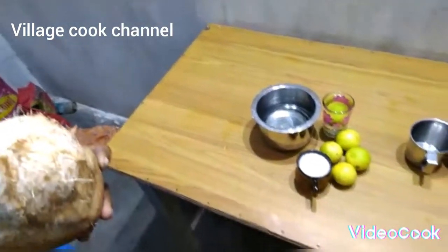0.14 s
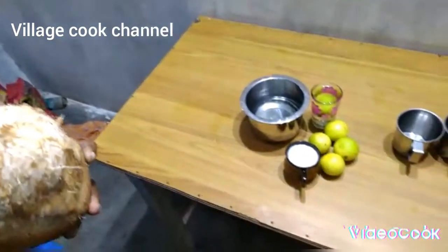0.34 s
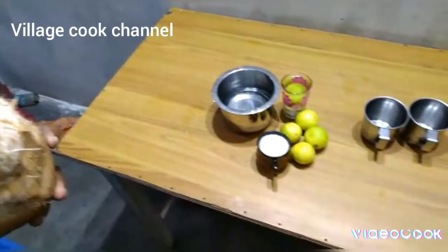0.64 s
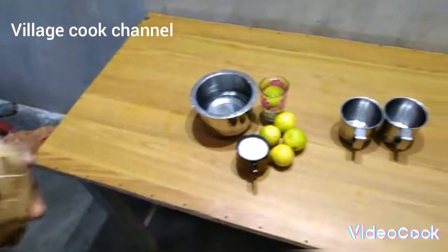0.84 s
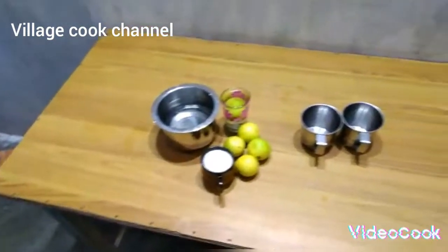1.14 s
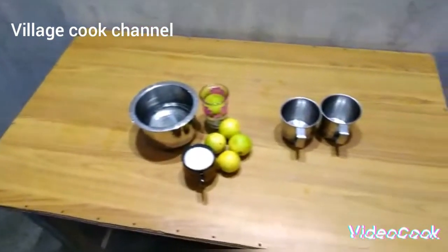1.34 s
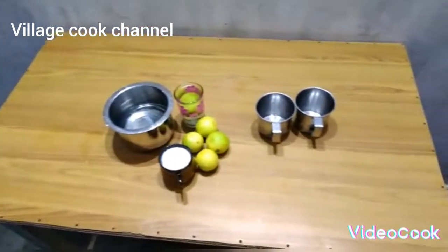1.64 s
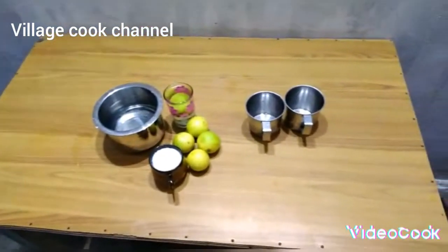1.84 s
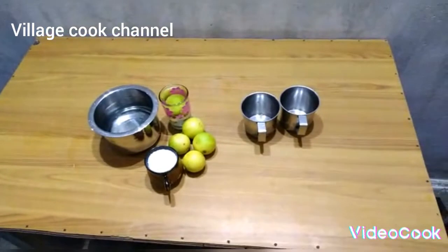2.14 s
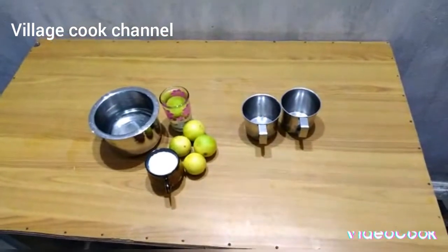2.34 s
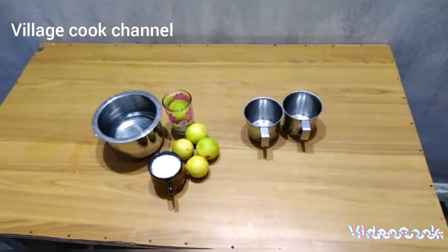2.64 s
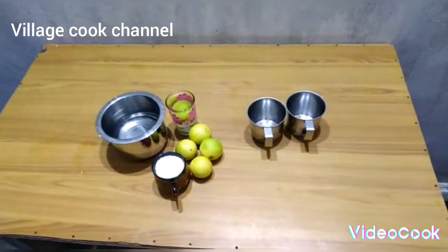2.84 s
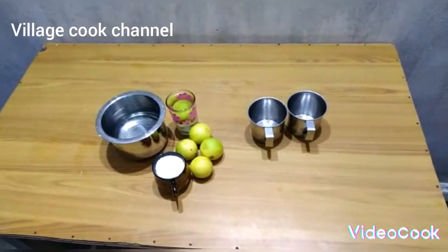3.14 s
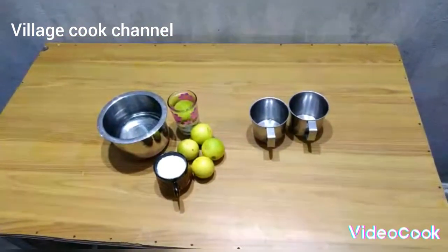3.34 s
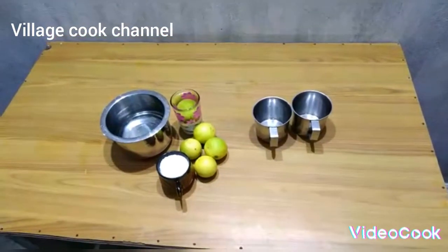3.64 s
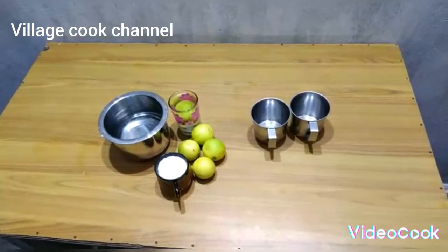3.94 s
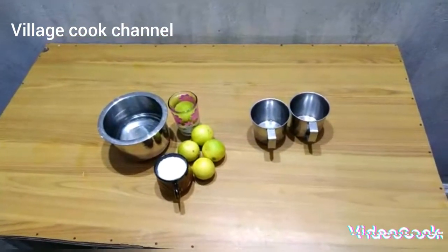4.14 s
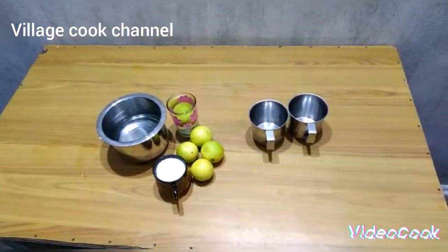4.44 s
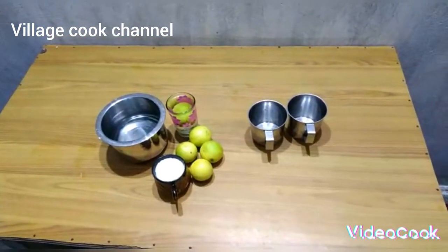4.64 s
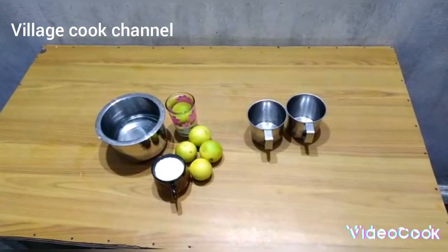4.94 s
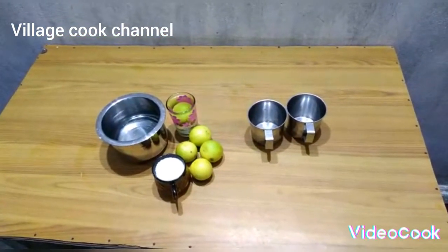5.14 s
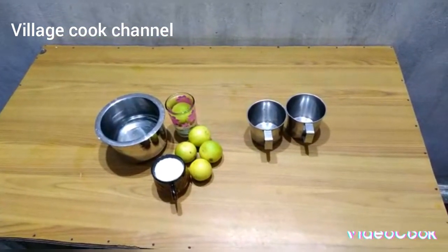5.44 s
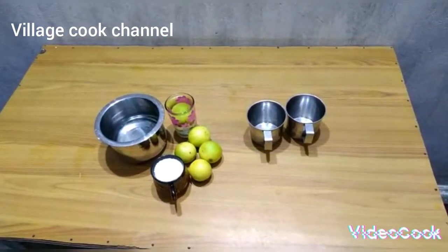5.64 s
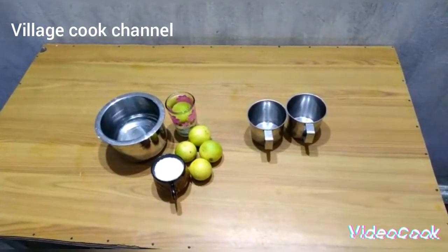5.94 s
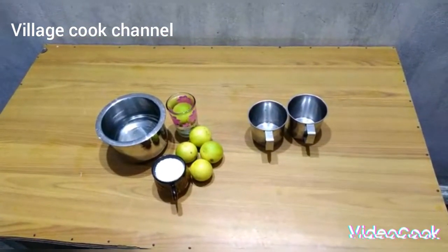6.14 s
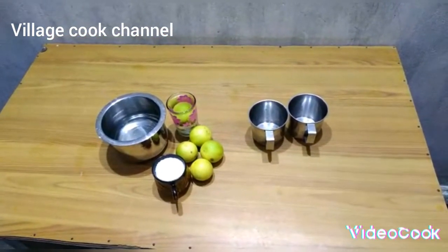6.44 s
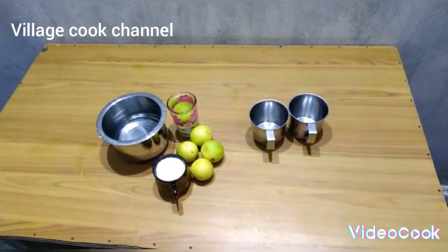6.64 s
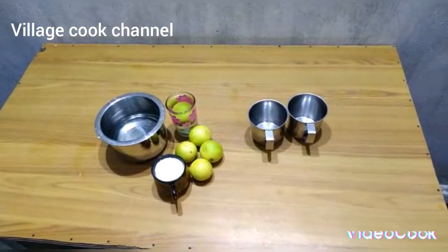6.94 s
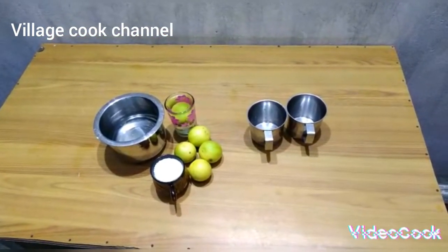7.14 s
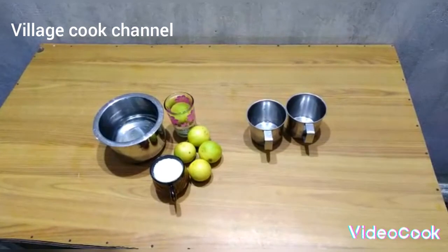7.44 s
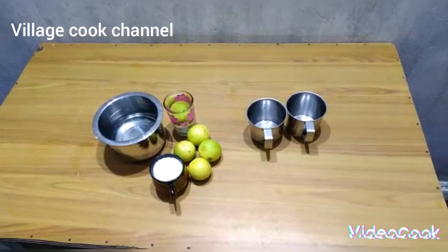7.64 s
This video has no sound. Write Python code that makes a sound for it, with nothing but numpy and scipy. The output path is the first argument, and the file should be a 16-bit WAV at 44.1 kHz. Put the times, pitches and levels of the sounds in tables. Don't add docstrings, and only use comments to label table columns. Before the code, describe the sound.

A phone close by hears a heavy knife working on a coconut: a loud first knock, a boomy chop, then brighter cracking chops, each preceded by a duller, mostly quieter knock. The last two chops are loudest. Hard walls return a half-second tail and steel cups ring very faintly. Dry husk rustles briefly in the hands; distant dove coos and thin bird whistles fill the gaps above soft village hum.

```python
import sys
import numpy as np
from scipy import signal
from scipy.io import wavfile
from scipy.ndimage import uniform_filter1d

SR = 44100
rng = np.random.default_rng(int(sys.argv[2]) if len(sys.argv) > 2 else 0)


def convert_level_to_amplitude(level_db):
    exponent = np.asarray(level_db, float) / 20
    return 10 ** exponent


def unload_wav(signal):
    wavfile.write(
        sys.argv[1],
        SR,
        np.round(np.clip(np.atleast_2d(signal).T, -1, 1) * 32767).astype(np.int16),
    )


N = 343494


def blow(db, hz, crack_db, thump_db, room_db, rise_s):
    # [ratio to the pitch, level/dB, t60/s]
    shell_modes = [(.8, 4.5, 0.0073), (1.0, 0.5, 0.013), (1.22, -4, 0.011), (1.6, -5.5, 0.008)]
    # [f/Hz, level/dB, t60/s]
    blade_modes = [(1436, -14.5, .02), (2315, -9.5, 0.037)]
    # [f/Hz, level/dB, t60/s]
    thump_modes = [(173.5, -5.5, .02), (250, -7, 0.04), (470, -2.5, 0.023), (620, -0.5, 0.02)]
    # [level/dB, t60/s]
    steel_decays = [(-39.5, 2.4), (-35.5, .8), (-40.5, 0.37), (-39, 0.32), (-39, 0.89), (-40.5, 0.66),
                    (-30.5, 0.7), (-44, .4), (-43, 0.77), (-37, .6), (-44, 0.61), (-43, 1.1), (-46, 0.57),
                    (-49, .25)]
    steel_hz = [276, 441, 478, 573, 603, 733, 845, 991, 1037, 1125, 1304, 1378, 1520, 2205]

    shell = modes(shell_modes, hz) + modes(blade_modes, rng.uniform(0.77, 1.04))
    thump = convert_level_to_amplitude(thump_db) * modes(thump_modes)
    rise = 1 - np.exp(-np.arange(len(shell)) / (rise_s * SR))
    near = rise * (0.88 * shell + 0.51 * thump)
    far = rise * (shell + thump)
    add(near, 0, convert_level_to_amplitude(crack_db + 16) * crack(.0016))
    add(far, 0, convert_level_to_amplitude(crack_db + 7.5) * edge())
    sound = room(far, room_db)
    add(sound, 0, direct(near))

    share_db = rng.uniform(-7, 5.8, len(steel_decays))
    shaken = [(f, level + share, t60) for f, share, (level, t60) in zip(steel_hz, share_db, steel_decays)]
    steel = modes(shaken, seconds=0.8)
    steel = convert_level_to_amplitude(thump_db + room_db) * steel * signal.windows.tukey(len(steel), .03)
    add(sound, .004, direct(steel))
    return convert_level_to_amplitude(db) * sound


def modes(table, scale=1, seconds=.06):
    return sum((-1) ** k * convert_level_to_amplitude(db) * ring(hz * scale, t60, seconds) for k, (hz, db, t60) in enumerate(table))


def ring(hz, t60, seconds=.12):
    t = np.arange(round(seconds * SR)) / SR
    return convert_level_to_amplitude(-60 * t / t60) * np.sin(2 * np.pi * hz * t)


def crack(decay_s):
    burst = rng.standard_normal(1024) * np.exp(-np.arange(1024) / SR / decay_s)
    return np.convolve(burst / np.linalg.norm(burst), edge())


def edge():
    # [f/Hz, level/dB]
    crack_colour = [(200, -18.5), (800, -12.5), (2000, 10), (4000, -0.5), (7000, -7), (11000, -7),
                    (14000, -17.5), (15600, -23.5), (16500, -41.5)]
    level_db = read(crack_colour, np.linspace(0, SR / 2, 129))
    taps = signal.minimum_phase(signal.firwin2(255, np.linspace(0, 1, 129), convert_level_to_amplitude(2 * level_db)))
    return taps / np.linalg.norm(taps)


def tick(db, hz):
    snap = 0.45 * ring(hz, .008, seconds=.04)
    add(snap, 0, convert_level_to_amplitude(9.5) * crack(0.0018))
    sound = room(snap, -5.5)
    add(sound, 0, direct(snap))
    return convert_level_to_amplitude(db + 9.5) * sound


def rustle(rows):
    s, db = np.transpose(rows)
    t = np.arange(s[0], s[-1], 1 / SR)
    shape = (2, len(t))
    size = convert_level_to_amplitude(2.3 * rng.exponential(1, shape))
    size = size * (rng.random(shape) < 4000 / SR)
    size = size * rng.choice([-1, 1], shape)
    snaps = evened(signal.oaconvolve(size, np.diff(edge())[None], axes=1)[:, :len(t)])
    return snaps * convert_level_to_amplitude(np.interp(t, s, db)) * signal.windows.tukey(len(t), .2)


def bird(rows, waver, lift_db):
    s, hz, db = np.transpose(rows)
    t = np.arange(s[0], s[-1], 1 / SR)
    drift = uniform_filter1d(rng.standard_normal((2, len(t))), 600) * 24
    turn = 2 * np.pi * np.cumsum(np.interp(t, s, hz) * (1 + waver * drift[0])) / SR
    level_db = np.interp(t, s, db) + lift_db + 2.6 * drift[1]
    note = np.cos(turn) * convert_level_to_amplitude(level_db) * signal.windows.tukey(len(t), .15)
    sound = room(note, -6.5)
    add(sound, 0, note * np.array([[.7], [1.2]]))
    return sound


def direct(sound):
    return np.array([sound, .8 * np.pad(sound, (6, 0))[:len(sound)]])


def room(sound, room_db):
    # [f/Hz, t60/s]
    room_t60 = [(100, .5), (300, 0.5), (700, 0.45), (1500, 0.47), (3000, 0.35), (6000, 0.43), (12000, 0.27)]
    # [f/Hz, level/dB]
    room_colour = [(100, -17), (400, 3), (1200, -2.5), (3000, 1), (8000, 1.5), (15000, 2.5)]
    tail = diffuse(SR, lambda hz, t: read(room_colour, hz) - 60 * t / read(room_t60, hz))
    tail *= 1 - np.exp(-np.arange(SR) / (0.0046 * SR))
    return convert_level_to_amplitude(room_db) * signal.fftconvolve(sound[None], tail / np.linalg.norm(tail[0]), axes=1)


def diffuse(length, field_db):
    # [f/Hz, likeness 0-1]
    ports_alike = [(30, 0.42), (250, .95), (600, 0.6), (1200, 0.02), (2400, 0.8), (5000, .05)]
    # [f/Hz, phase/rad]
    port_lead = [(100, 0.75), (600, 0.73), (1200, .3), (1900, -1.5), (3000, 0.56), (8000, -0.096)]
    hz = np.fft.rfftfreq(512, 1 / SR)[:, None]
    t = np.arange(length // 128 + 5) * 128 / SR
    a, b, c, d = rng.standard_normal((len(t), 257, 4)).T
    alike = np.clip(read(ports_alike, hz), 0, 1)
    first = a + 1j * b
    second = alike * first * np.exp(1j * read(port_lead, hz)) + np.sqrt(1 - alike ** 2) * (c + 1j * d)
    z = np.array([first, second]) * convert_level_to_amplitude(field_db(hz, t))
    return signal.istft(z, nperseg=512, noverlap=384)[1][:, :length]


def air():
    # [f/Hz, level/dB]
    air_colour = [(25, 11.5), (60, 2), (120, -4), (250, -3), (500, -7.5), (1200, -13.5), (2500, -18),
                  (5000, -24), (10000, -29), (15500, -37.5)]
    swell = rng.standard_normal((N // 128 + 5, 257)).T
    swell = evened(uniform_filter1d(uniform_filter1d(swell, 6, 0), 40, 1))
    hum = diffuse(N, lambda hz, t: read(air_colour, hz) + 0.93 * swell * 1500 / (1500 + hz))
    return convert_level_to_amplitude(-57) * evened(hum)


def evened(x):
    return x / np.sqrt(np.mean(x ** 2) + 1e-20)


def read(points, hz):
    f, value = np.transpose(points)
    return np.interp(np.log(hz + 1), np.log(f + 1), value)


def add(mix, s, sound):
    part = mix[..., round(s * SR):][..., :sound.shape[-1]]
    part += sound[..., :part.shape[-1]]


def scene():
    # [t/s, blow level/dB, shell f/Hz, then edge crack, low thump and room level/dB re blow]
    knocks = [
        (0.4428, -8.5, 820, -21, -5.5, -4),
        (1.3804, -38.5, 620, -3, 3, 7),
        (2.257, -18.5, 820, -15, -6.5, 6),
        (3.705, -19.5, 760, -12, 3.5, 0),
        (5.4581, -27.5, 520, -5.5, 8.5, -3),
        (6.46, -20, 780, -16, -4.5, 4.5),
    ]
    chops = [
        (0.8357, -10.5, 852, 1.5, -2.5, 10),
        (1.7383, -9, 1250, 4.5, -2.5, 4.9),
        (2.6255, -9.5, 1242, 4.5, -7.5, 6.2),
        (4.094, -6.5, 1089, 2, -8.5, 5.3),
        (5.8405, -4.5, 1170, -1.5, -3.5, 1.4),
        (6.8011, -4.5, 1242, -2.5, -15, 5.67),
    ]
    # [t/s, peak level/dB, f/Hz]
    ticks = [(2.0902, -51, 3430), (4.034, -38.5, 1960), (4.715, -51, 2070), (4.7751, -49, 2030),
             (5.3744, -63, 4100), (5.4102, -42.5, 2560), (5.7913, -38.5, 3415), (6.765, -46.5, 3975),
             (7.3592, -52.5, 3320), (7.3911, -44, 3480), (7.5727, -55.5, 1925), (7.6375, -46.5, 1880)]
    # [t/s, level/dB]
    rustles = [
        [(2.04, -76), (2.046, -75), (2.082, -80), (2.092, -55), (2.16, -97)],
        [(5.1, -65), (5.178, -63.5), (5.252, -68), (5.288, -48), (5.35, -70), (5.38, -54.5), (5.392, -72.5),
         (5.44, -79.5)],
        [(7.5, -83), (7.506, -89), (7.56, -58), (7.572, -54.5), (7.648, -69.5), (7.708, -92), (7.72, -77)],
    ]
    # [t/s, f/Hz, level/dB]
    coos = [
        [(1.47, 437, -71), (1.514, 426, -61), (1.526, 440, -53), (1.56, 448.1, -77)],
        [(1.63, 410.8, -71), (1.666, 426, -50), (1.682, 426, -66), (1.72, 447.9, -81)],
        [(2.46, 444, -76), (2.488, 434, -67), (2.512, 425, -57), (2.522, 430, -59), (2.56, 440, -67)],
        [(3.24, 448, -75), (3.276, 441, -56.5), (3.402, 425, -75), (3.426, 425, -58.5), (3.466, 432, -66),
         (3.5, 420, -64)],
        [(3.85, 448, -81.5), (3.862, 445, -77.5), (3.894, 452, -61.5), (3.962, 449, -84), (4.0, 454, -54)],
        [(4.42, 427.7, -77), (4.48, 444, -63.5), (4.512, 414, -82), (4.544, 448, -56.5), (4.632, 438, -78.5),
         (4.638, 418, -62.5), (4.814, 431, -70.5), (4.82, 435, -84)],
        [(5.33, 465.0, -70), (5.354, 472, -67), (5.37, 450, -57.5), (5.432, 443, -57.5), (5.45, 430, -66.5)],
        [(6.2, 431.2, -70), (6.3, 465, -65), (6.368, 415, -56), (6.432, 443, -65.5), (6.448, 462, -84),
         (6.45, 460.7, -69)],
        [(7.52, 441, -78.5), (7.58, 438, -62.5), (7.618, 434, -92), (7.63, 441, -61), (7.7, 414, -78)],
        [(3.5, 399, -66), (3.602, 387, -65), (3.636, 400, -81.5), (3.678, 400, -54.5), (3.69, 383, -74.5)],
        [(6.6, 407, -75.5), (6.614, 391, -56.5), (6.624, 388, -67.5), (6.76, 404, -63), (6.79, 380, -49.5)],
        [(7.15, 389.3, -75), (7.206, 388.3, -62.5), (7.256, 393.6, -58), (7.32, 386.6, -73.5),
         (7.366, 384.3, -64), (7.456, 367.4, -70), (7.5, 366, -69.5)],
    ]
    # [t/s, f/Hz, level/dB]
    low_coos = [
        [(0.0, 213, -59), (0.028, 243, -62.5), (0.13, 270, -57.5), (0.154, 251, -63), (0.16, 250, -67.5)],
        [(4.8, 236.3, -76.5), (4.856, 247, -67), (4.964, 267.7, -68.5), (4.996, 253, -58), (5.058, 243, -62),
         (5.07, 244, -84.5), (5.122, 248, -62), (5.25, 257, -74.5)],
    ]
    # [t/s, f/Hz, level/dB]
    whistles = [
        [(.18, 1415, -65.5), (.23, 1453, -66.5), (.32, 1479, -75)],
        [(3.88, 1272, -68), (3.93, 1260, -49.5), (4.0, 1285, -45.5), (4.04, 1320, -60), (4.09, 1310, -46)],
        [(5.14, 1500, -72), (5.17, 1492, -51.5), (5.22, 1470, -60), (5.27, 1420, -50), (5.32, 1430, -59),
         (5.345, 1495, -42.5), (5.38, 1540, -64), (5.43, 1580, -47), (5.47, 1608, -57), (5.52, 1480, -53.5),
         (5.56, 1225, -53), (5.61, 1195, -71)],
        [(5.36, 1427, -60), (5.39, 1455, -52), (5.42, 1430, -66)],
        [(5.53, 1570, -65), (5.6, 1560, -53.5), (5.68, 1676, -64.5), (5.72, 1580, -77.5)],
        [(5.62, 717, -55), (5.68, 742, -57), (5.76, 773, -57)],
        [(5.7, 1730, -60.5), (5.75, 1900, -67.5), (5.8, 1850, -66)],
    ]
    mix = air()
    for s, *row in knocks:
        add(mix, s, blow(*row, rise_s=0.00075))
    for s, *row in chops:
        add(mix, s, blow(*row, rise_s=0.00067))
    for s, *row in ticks:
        add(mix, s, tick(*row))
    for rows in rustles:
        add(mix, rows[0][0], rustle(rows))
    for rows in coos + low_coos:
        add(mix, rows[0][0], bird(rows, waver=0.0053, lift_db=2.8))
    for rows in whistles:
        add(mix, rows[0][0], bird(rows, waver=.003, lift_db=-2))
    return mix


def top_cut(x):
    return signal.sosfilt(signal.butter(12, 16780, fs=SR, output="sos"), x)


def record(dry):
    # [t/s, level/dB]
    gain = [(0, 8.5), (.3, 9), (.44, 7.5), (.47, 9), (.83, 4), (.86, -3.97), (7.8, -3.5)]
    bass_cut = signal.butter(2, 110, "high", fs=SR, output="sos")
    dry = signal.sosfilt(bass_cut, dry) * convert_level_to_amplitude([[-.8], [.8]])

    late = np.pad(dry, ((0, 0), (18, 0)))[::-1, :N]
    bass = signal.oaconvolve(late, signal.firwin(63, 2600, fs=SR)[None], "same")
    sides = dry - .9 * (late - 0.4 * bass)
    band_limit = signal.firwin(255, 15850, window=("kaiser", 6), fs=SR)
    sides = signal.oaconvolve(sides, band_limit[None], "same")
    sides *= convert_level_to_amplitude(np.interp(np.arange(N) / SR, *np.transpose(gain)))

    power_db = 10 * np.log10(abs(uniform_filter1d((sides ** 2).mean(0), 800)) + 1e-12)
    lift_db = 4.1 * np.clip((power_db + 53.5) / 6, 0, 1)
    return top_cut(np.clip(sides * convert_level_to_amplitude(lift_db), -1, 1))


dry = scene()
out = record(dry)
unload_wav(out)
```